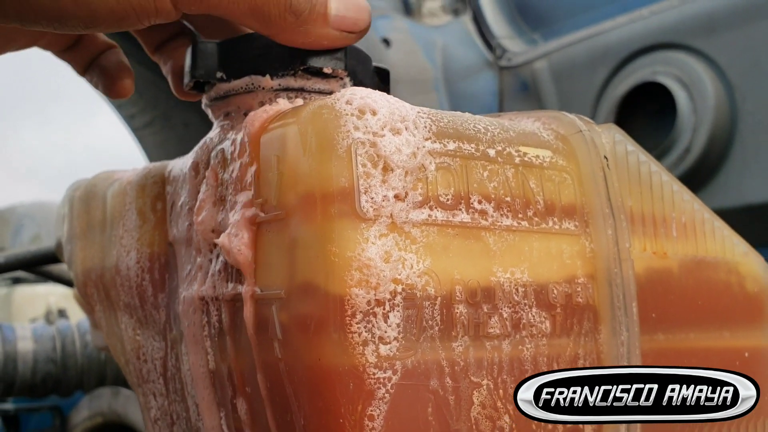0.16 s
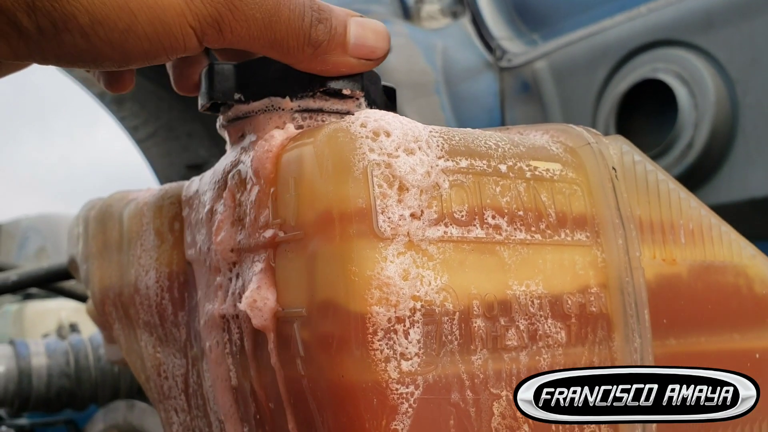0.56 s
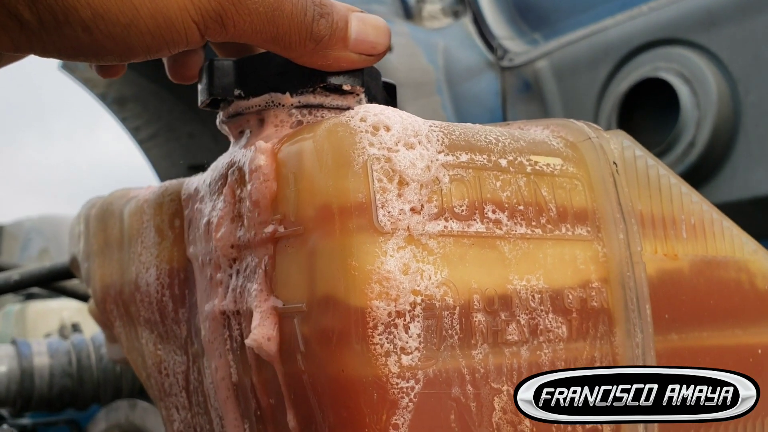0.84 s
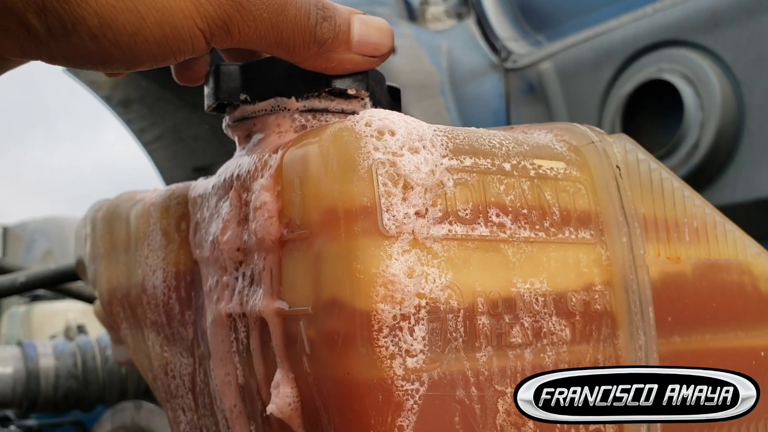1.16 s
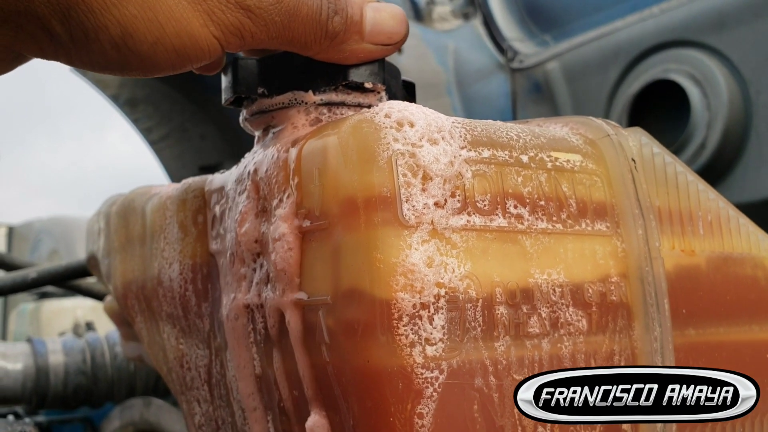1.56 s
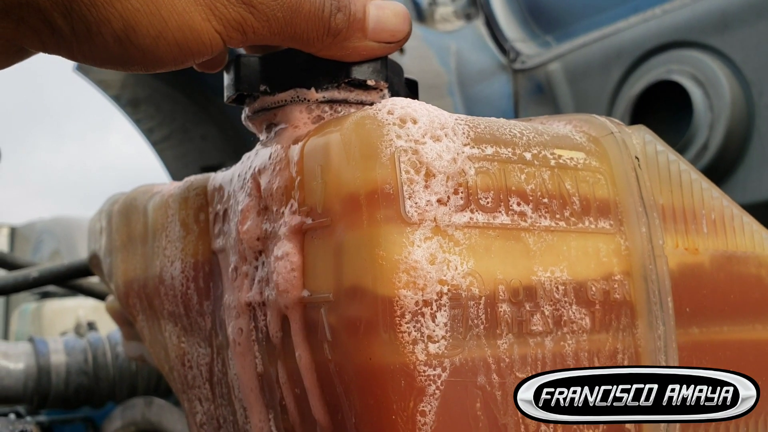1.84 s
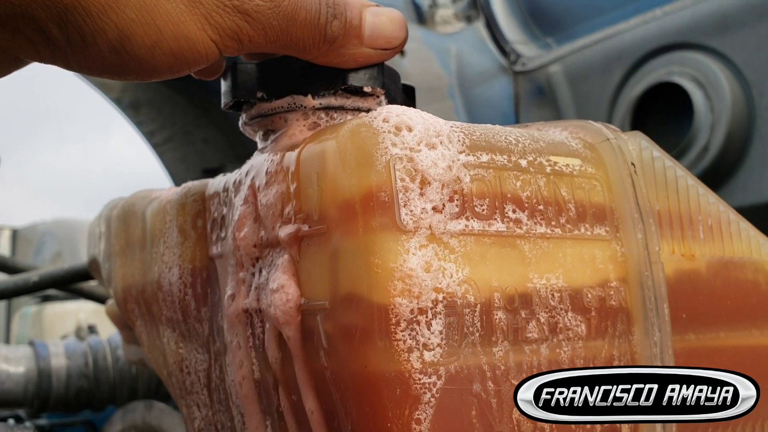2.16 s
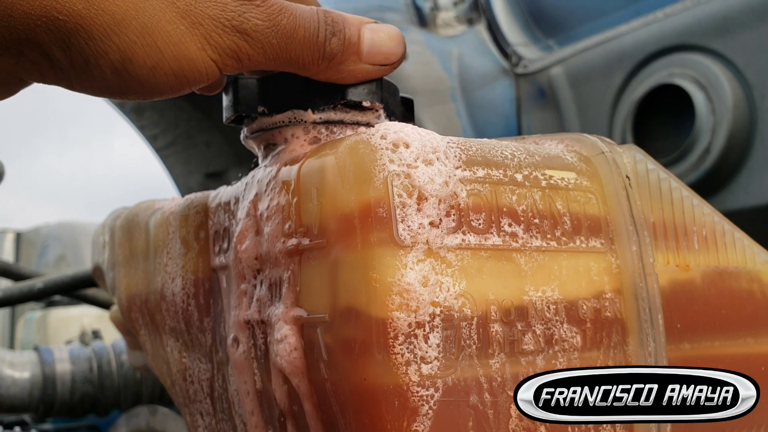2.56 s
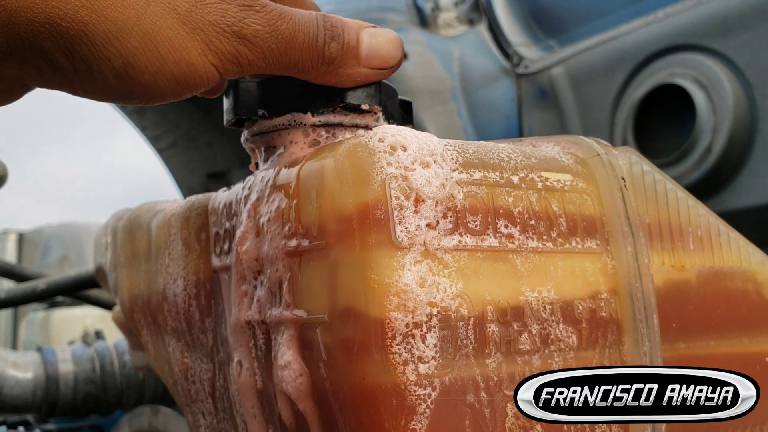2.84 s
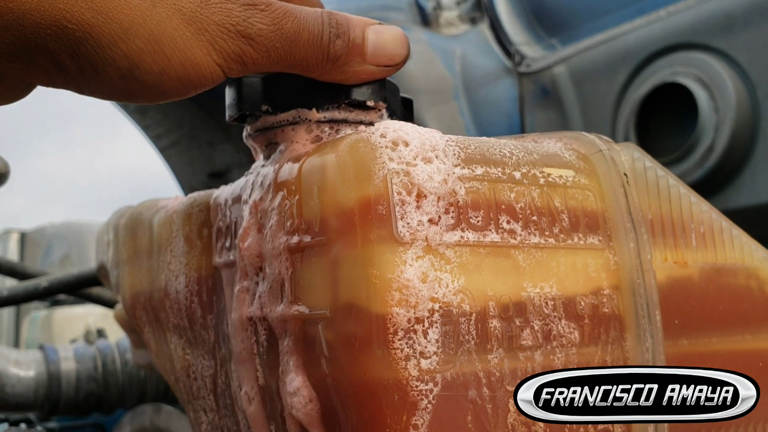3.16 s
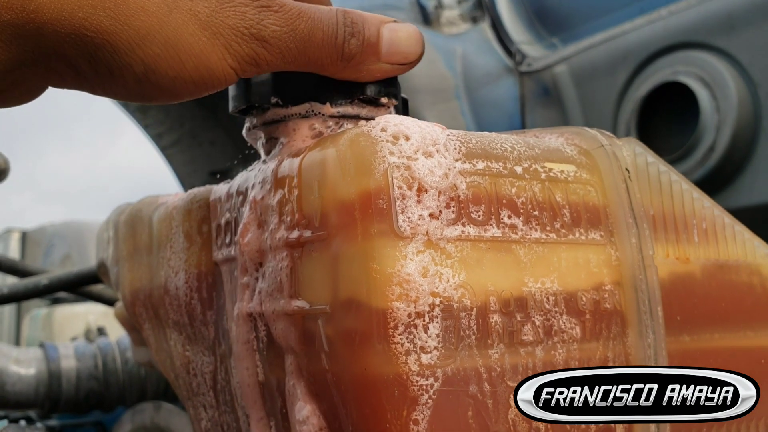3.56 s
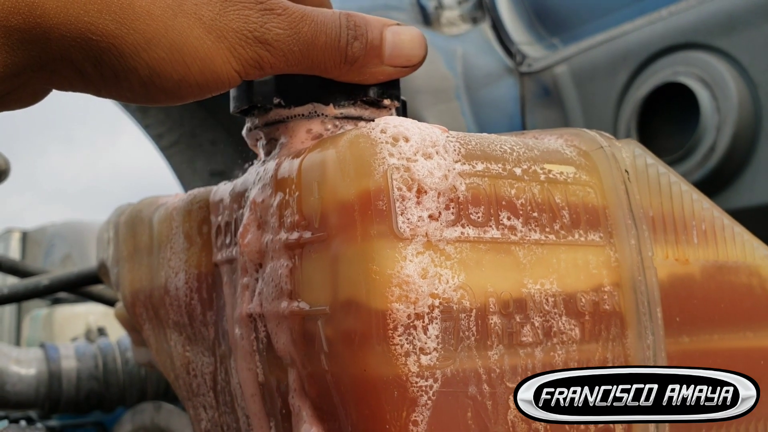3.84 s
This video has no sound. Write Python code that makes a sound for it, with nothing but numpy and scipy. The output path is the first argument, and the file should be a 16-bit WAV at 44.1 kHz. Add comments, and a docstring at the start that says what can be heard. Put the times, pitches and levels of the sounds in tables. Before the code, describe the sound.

Pressurised gas and coolant hiss and spit from a tank cap, with wind on the microphone.

```python
"""Hot gas and foaming coolant hiss out under the cap of an expansion tank in an open engine bay.
A hand rocks the cap, so the seal opens and shuts, and wet spits crackle through it.
The tank's neck rings in the hiss, foam fizzes as tiny bubbles pop, and nearby metal adds short echoes.
Gusts of wind buffet the microphone, mostly on the right."""
import sys
import numpy as np
from scipy import signal
from scipy.fft import rfft, irfft
from scipy.io import wavfile

SR = 44100
rng = np.random.default_rng(int(sys.argv[2]) if len(sys.argv) > 2 else 0)


def dump(signal):
    """Clip the signal to [-1, 1] and save it as 16-bit WAV at the path in sys.argv[1]."""
    limited = np.clip(np.atleast_2d(signal).T, -1, 1)
    pcm = np.round(limited * 32767).astype(np.int16)
    wavfile.write(sys.argv[1], SR, pcm)


N = 176400
T = np.arange(N) / SR

# When the seal is open. Each row: start in seconds, end in seconds, opening surge in dB.
SEAL_OPENINGS = [(-.1, 0.109, -2.5), (0.283, 0.445, -3), (0.58, 0.857, 5.5), (0.975, 2.178, 13.5),
                 (2.259, 2.397, 9.5), (2.415, 2.82, 3), (2.843, 2.97, 5), (3.169, 3.495, 2),
                 (3.523, 3.678, 1), (3.714, 4.122, 7.5)]
# How hard the gas flows through the open seal. Each row: time in seconds, relative level in dB.
JET_LEVELS = [(.05, -45.5), (.11, -44), (.4, -48.5), (.62, -50.5), (.74, -48), (.84, -43), (1.0, -56.5),
              (1.2, -50.5), (1.67, -52), (1.97, -48.5), (2.33, -52), (2.5, -47.5), (2.8, -49.5),
              (3.42, -44), (3.7, -43.5), (3.79, -45), (3.84, -39), (3.91, -44), (3.97, -38.5)]
# The tone of the hiss. Each row: frequency in Hz, left level in dB, right level in dB.
JET_TONE = [(510, -11.5, -10), (1965, -5.5, -16.5), (2350, -12.5, -33), (3040, -5, -28),
            (3850, -5.5, -12.5), (5070, -3.5, -6), (5500, -4.5, -9.5), (7240, -3.5, -8.5), (7700, -10, -40),
            (10700, -9, -1), (10800, 0, -11.5), (11500, -10, 0), (13600, -8, -15.5)]
# Where the neck and cap ring. Each entry: frequency in Hz.
NECK_RINGS_HZ = [3414, 3990, 4890, 5130, 5920, 6730, 10960, 12900]
# Echoes from the nearest surfaces. Each row: delay in seconds, strength as a share of the direct sound.
NEAR_ECHOES = [(.00102, 0.13), (.00287, 0.0049)]
# How strongly the foam fizzes. Each row: time in seconds, relative level in dB.
FOAM_LEVELS = [(.3, -51.5), (1.5, -50.5), (2.0, -46), (2.6, -51.5), (3.1, -48.5), (4.0, -43.5)]
# The tone of the fizz. Each row: frequency in Hz, level in dB.
FOAM_TONE = [(200, -1), (1050, -2.5), (1900, -4.5), (2500, -7.5), (5000, -17.5)]
# Gusts on the right. Each row: time in seconds, rumble strength in dB, flutter strength in dB.
RIGHT_GUSTS = [(.035, -28, -47), (.045, -18.5, -29), (.19, -20, -34), (.27, -26, -45.5), (.35, -21, -29.5),
               (.47, -28.5, -58), (.52, -24.5, -22.5), (.58, -13, -24), (.61, -23.5, -42.5),
               (.69, -21.5, -30.5), (.8, -33.5, -56), (.88, -28, -33.5), (.97, -25.5, -76),
               (1.17, -34.5, -56), (1.31, -28, -47), (1.73, -31, -65), (1.9, -42.5, -74), (2.02, -29, -71),
               (2.1, -48.5, -105), (2.75, -31.5, -53.5), (2.85, -57, -88), (3.09, -35, -86),
               (3.39, -35, -65), (3.68, -51, -103), (3.85, -30, -65), (4.0, -48, -73)]
# Gusts on the left. Each row: time in seconds, rumble strength in dB.
LEFT_GUST_LEVELS = [(.4, -50.5), (.98, -31), (1.11, -51), (1.6, -42.5), (2.44, -78), (2.74, -57),
                    (3.3, -49), (4.0, -46.5)]
# The tone of the deep draught under the gusts. Each row: frequency in Hz, level in dB.
DRAUGHT_TONE = [(22, -19), (48, 14), (85, 11.5), (200, -34.5)]
# The tone of the wind's rumble on the right. Each row: frequency in Hz, level in dB.
RIGHT_RUMBLE_TONE = [(25, -41.5), (65, -2), (115, 2), (200, -7), (320, -19), (900, -81)]
# The tone of the wind's higher flutter. Each row: frequency in Hz, level in dB.
FLUTTER_TONE = [(60, -14), (170, 3.5), (340, 2.5), (680, -16.5), (1900, -53)]
# The tone of the wind's rumble on the left. Each row: frequency in Hz, level in dB.
LEFT_RUMBLE_TONE = [(25, -25.5), (80, 14.5), (380, -3.5), (1500, -37.5)]
# Spits of coolant. Each row: start in seconds, relative level in dB, fade time in seconds.
COOLANT_SPITS = [(0.146, -47, 0.0091), (0.217, -41, 0.0075), (0.296, -40, 0.11), (0.588, -36.5, 0.017),
                 (.985, -36.5, 0.012), (1.648, -40, 0.027), (1.674, -36, 0.089), (1.955, -38, 0.024),
                 (2.21, -42.5, 0.027), (2.261, -31, 0.016), (2.767, -34.5, 0.014), (2.828, -33, 0.0015),
                 (2.855, -31.5, 0.013), (2.98, -26.5, 0.0022), (2.9914, -33.5, 0.003), (3, -34, 0.0033),
                 (3.0224, -36.5, 0.0035), (3.044, -37.5, 0.011), (3.069, -37.5, 0.029), (3.73, -34, 0.023)]
# The tone of the spits. Each row: frequency in Hz, level in dB.
SPIT_TONE = [(600, -6.5), (2300, -5.5), (4200, 3.5), (6500, 2.5), (8200, -8.5), (15000, -15)]


def from_db(db):
    """Turn decibels into a number to multiply by."""
    return 10 ** (np.asarray(db) / 20)


def unit_power(x):
    """Scale a signal so its average power is 1."""
    return x / np.sqrt(np.mean(x ** 2) + 1e-20)


def over_time(rows):
    """Join a table's points with straight lines: one curve for each level column."""
    seconds, *columns = np.transpose(rows)
    return [np.interp(T, seconds, column) for column in columns]


def drift(rate_hz):
    """A smooth random wobble with a typical size of 1."""
    pole = np.exp(-2 * np.pi * rate_hz / SR)
    return unit_power(signal.lfilter([1], [1, -2 * pole, pole * pole], rng.standard_normal(2 * N))[N:])


def with_tone(x, tone, size=16384):
    """Filter a sound by a tone table, giving one channel for each level column."""
    hz, *columns = np.transpose(tone)
    log_hz = np.log(np.arange(size // 2 + 1) * SR / size + 1)
    gains = from_db([np.interp(log_hz, np.log(hz), column) for column in columns])
    # Folding the cepstrum makes the filter ring only after a sound, never before it.
    cepstrum = irfft(np.log(gains))
    cepstrum[:, 1:size // 2] *= 2
    cepstrum[:, size // 2 + 1:] = 0
    response = unit_power(irfft(np.exp(rfft(cepstrum)))) / np.sqrt(size)
    return signal.fftconvolve(np.atleast_2d(x), response, axes=1)[:, :N]


def clicks(per_s, spread_db):
    """Tiny clicks of uneven size at random moments."""
    sizes = from_db(spread_db * np.minimum(rng.exponential(1, N), 4))
    return unit_power(sizes * rng.choice([-1, 1], N) * (rng.random(N) < per_s / SR))


def wide(source, separate_share=0.52):
    """Spread a sound out: one part is the same on both sides, the rest is separate."""
    common = np.sqrt(1 - separate_share) * source()
    return common + np.sqrt(separate_share) * np.array([source(), source()])


def to_left(x, pan_db):
    """Shift a sound to the left by this many decibels."""
    return x * from_db(pan_db * np.array([[.5], [-.5]]))


def dulled(x, top_hz):
    """Cut away the treble above this frequency."""
    return signal.sosfilt(signal.butter(6, top_hz, fs=SR, output="sos"), x)


def jet(open_s=0.019, surge_s=0.13, shut_db_per_s=757):
    """Gas and droplets rush out while the seal is open; most openings start with a surge."""
    flow_db, = over_time(JET_LEVELS)
    gap = np.zeros(N)
    for start, end, surge_db in SEAL_OPENINGS:
        opening = np.clip((T - start) / open_s, 0, 1)
        fading_surge_db = surge_db * np.exp(-np.maximum(T - start, 0) / surge_s)
        closing_db = shut_db_per_s * np.maximum(T - end, 0)
        gap = np.maximum(gap, opening * from_db(fading_surge_db - closing_db))
    # Smooth noise is the gas; clicks are the droplets.
    rush = wide(lambda: rng.standard_normal(N) + from_db(-8) * clicks(per_s=800, spread_db=-1.5))
    unsteady_db = 1.53 * drift(rate_hz=25) + 0.72 * drift(rate_hz=380)
    return with_tone(rush * gap * from_db(4 + flow_db + unsteady_db), JET_TONE)


def neck(x, width_hz=15, ring_gain=0.63):
    """The filler neck and cap ring at a few sharp pitches, on top of the sound passing through."""
    pole = np.exp(-np.pi * width_hz / SR)
    band = np.array([1, 0, -1]) * (1 - pole * pole) / 2
    rings = sum(signal.lfilter(band, [1, -2 * pole * np.cos(2 * np.pi * hz / SR), pole * pole], x)
                for hz in NECK_RINGS_HZ)
    return x + ring_gain * rings


def engine_bay(x, die_away_s=0.055, right_delay_s=0.00032, size=4096):
    """Nearby metal echoes the sound and small parts scatter its treble; the left side hears it first."""
    scatter = rng.standard_normal((2, size)) * from_db(-60 * T[:size] / die_away_s)
    scatter = signal.sosfilt(signal.butter(2, 1990, "high", fs=SR, output="sos"), scatter)
    response = unit_power(scatter) / np.sqrt(size) * from_db(-5)
    response[:, 0] = 1  # the direct sound
    for delay_s, gain in NEAR_ECHOES:
        response[:, round(delay_s * SR)] += gain
    left, right = signal.fftconvolve(x, unit_power(response) / np.sqrt(size), axes=1)[:, :N]
    return np.array([left, np.pad(right, (round(right_delay_s * SR), 0))[:N]])


def foam():
    """Countless small bubbles pop on the tank wall."""
    level_db, = over_time(FOAM_LEVELS)
    pops = wide(lambda: clicks(per_s=9000, spread_db=-3))
    fizz = to_left(with_tone(pops, FOAM_TONE), pan_db=7.5)
    return dulled(from_db(level_db - 3) * fizz, top_hz=6000)


def wind():
    """Swirling air hits each side of the microphone separately; hard gusts add a higher flutter."""
    def swirls(level_db, tone):
        lumpy_noise = rng.standard_normal(N) * from_db(level_db + 4 * drift(rate_hz=35))
        return with_tone(lumpy_noise, tone)[0]
    gust_db, flutter_db = over_time(RIGHT_GUSTS)
    left_db, = over_time(LEFT_GUST_LEVELS)
    swing_db = gust_db - gust_db.mean()
    # The draught swings less than the rumble, so weak gusts sound deeper than hard ones.
    draught = swirls(-37 + 0.39 * swing_db, DRAUGHT_TONE)
    rumble = swirls(-3.5 + gust_db.mean() + 1.144 * swing_db, RIGHT_RUMBLE_TONE)
    flutter = swirls(flutter_db + 4, FLUTTER_TONE)
    left = swirls(left_db, LEFT_RUMBLE_TONE)
    return dulled(np.array([left, draught + rumble + flutter]), top_hz=2000)


def spits(crackle_fade_s=0.0013):
    """Each blob of coolant bursts into a brief shower of drops; small ones crackle as the foam builds."""
    bursts = sum(from_db(db) * (T >= start) * np.exp(-np.maximum(T - start, 0) / fade_s)
                 for start, db, fade_s in COOLANT_SPITS)
    foam_db, = over_time(FOAM_LEVELS)
    ticks = np.abs(clicks(per_s=140, spread_db=-1)) + 1e-18
    crackle = unit_power(signal.lfilter([1], [1, -np.exp(-1 / (crackle_fade_s * SR))], ticks))
    crackle_db = -53 + 1.44 * (foam_db - foam_db.mean())
    strength = np.hypot(bursts, from_db(crackle_db) * crackle)
    drops = wide(lambda: clicks(per_s=9500, spread_db=2))
    return from_db(-3) * to_left(with_tone(strength * drops, SPIT_TONE), pan_db=6)


def scene():
    """The hissing cap and the foam in the engine bay, with wind on the microphone."""
    return engine_bay(neck(jet() + spits()) + foam()) + wind()


def record(dry, low_cut_hz=30, top_hz=15850):
    """Take out the deepest rumble and the very highest treble."""
    thinned = signal.sosfilt(signal.butter(2, low_cut_hz, "high", fs=SR, output="sos"), dry)
    return signal.fftconvolve(thinned, signal.firwin(601, top_hz, fs=SR)[None], "same", axes=1)


dry = scene()
out = record(dry)
dump(out)
```